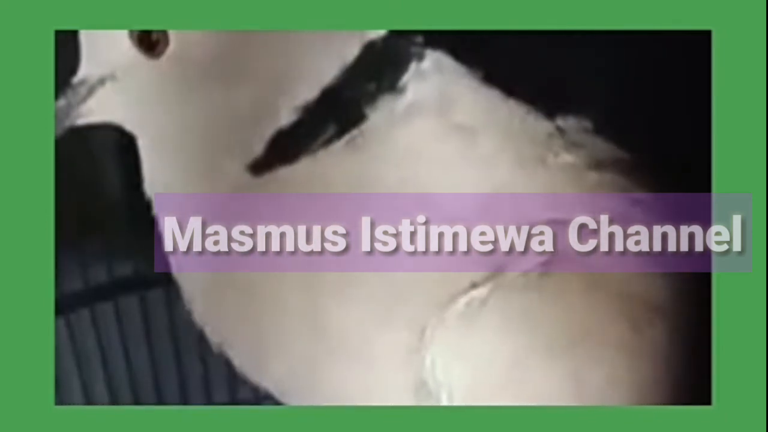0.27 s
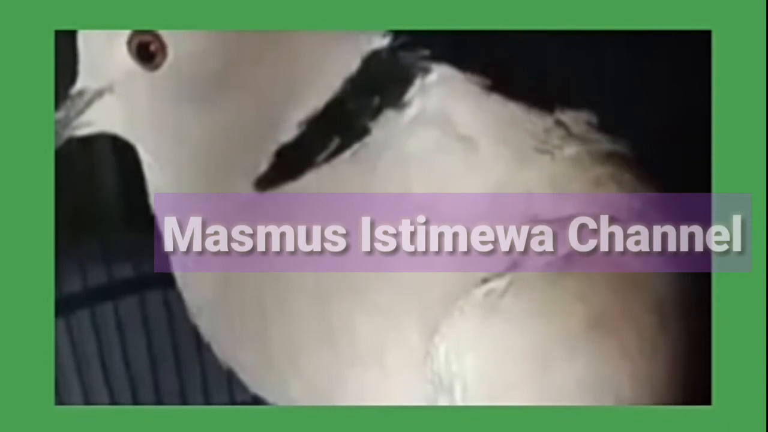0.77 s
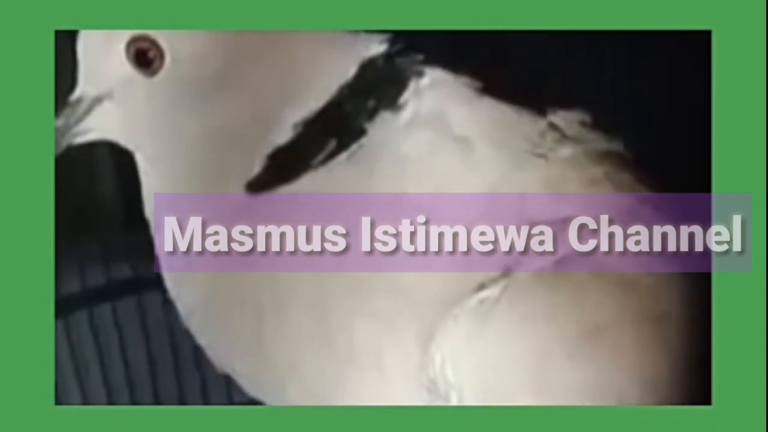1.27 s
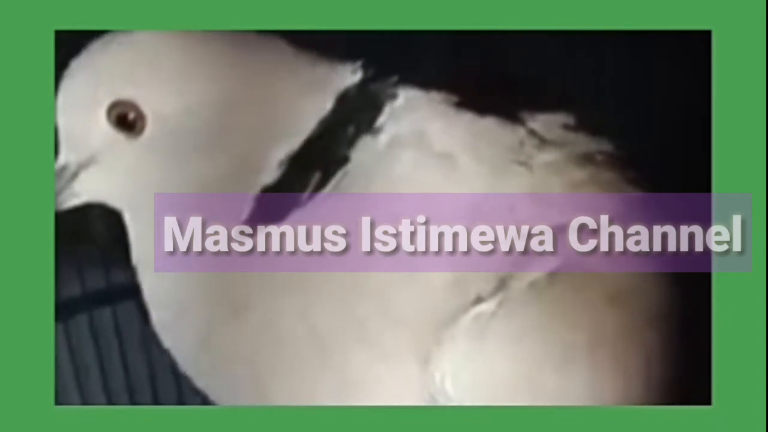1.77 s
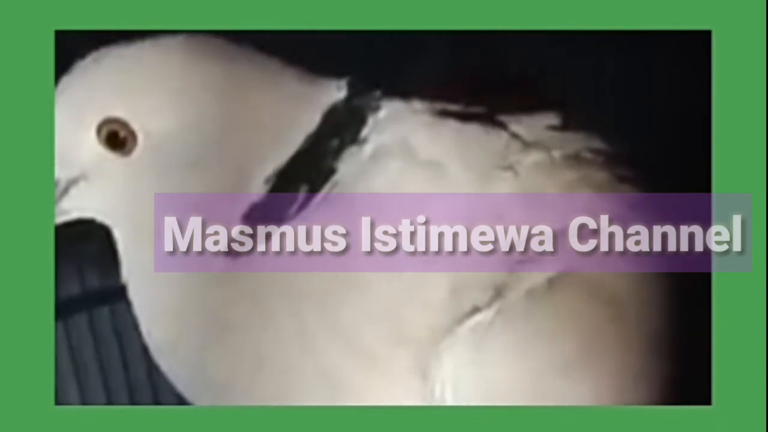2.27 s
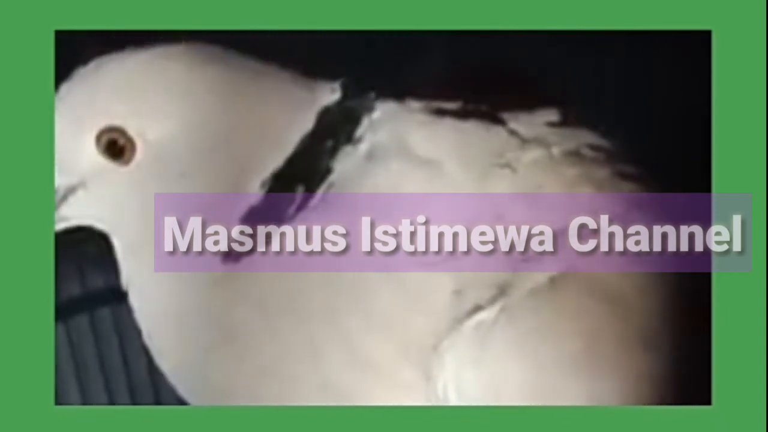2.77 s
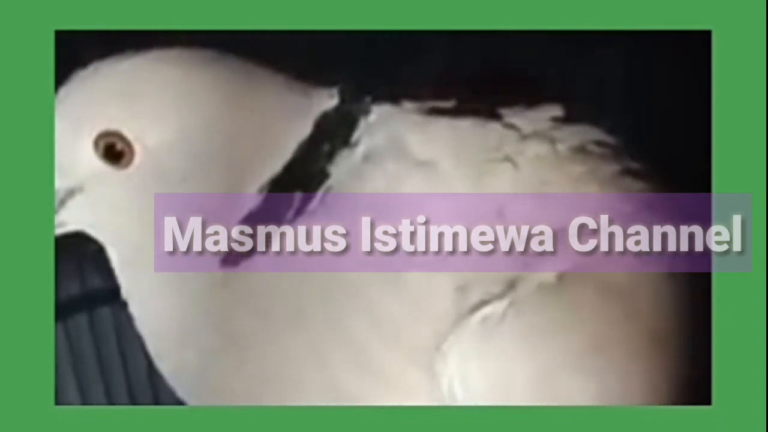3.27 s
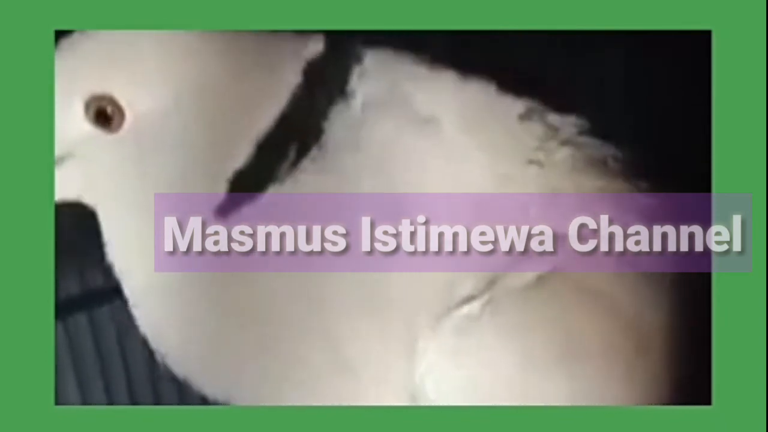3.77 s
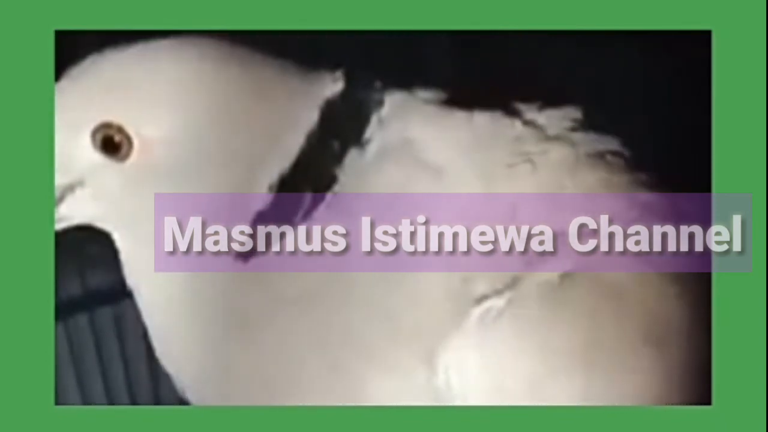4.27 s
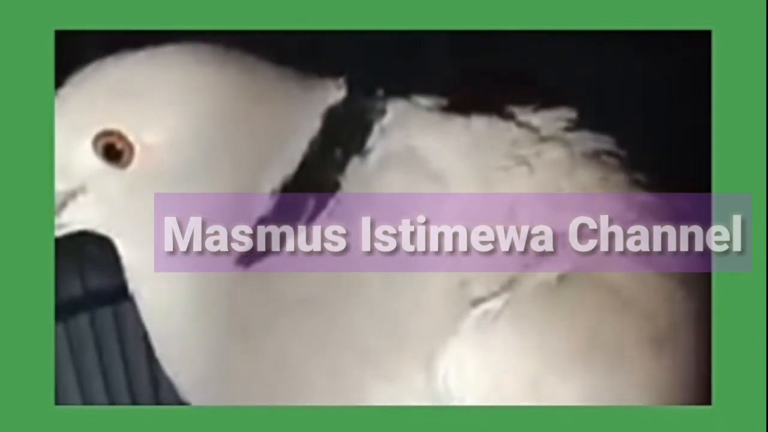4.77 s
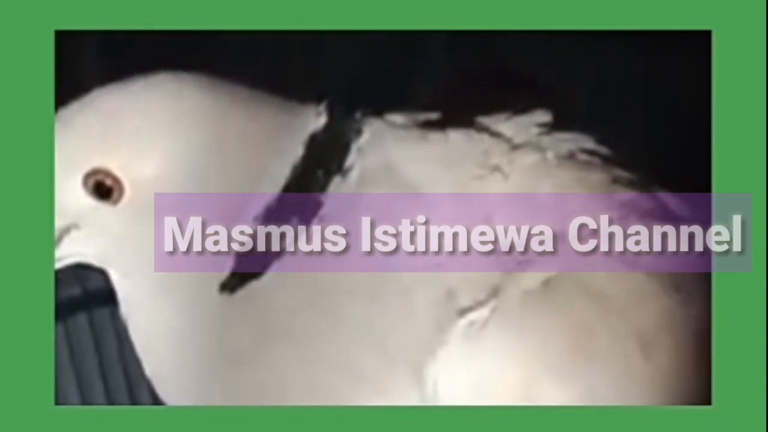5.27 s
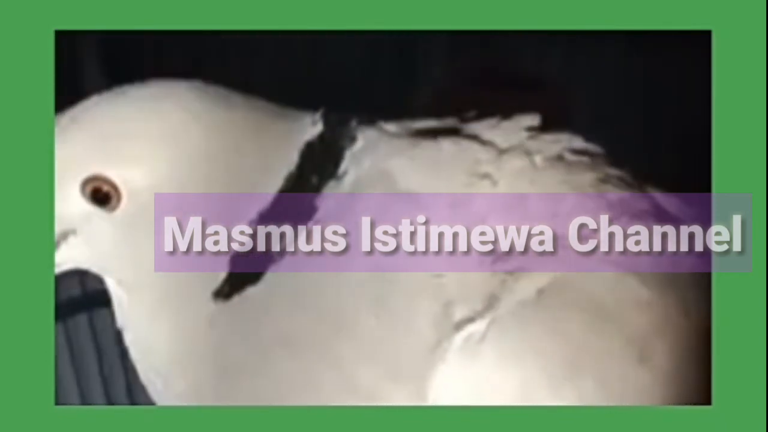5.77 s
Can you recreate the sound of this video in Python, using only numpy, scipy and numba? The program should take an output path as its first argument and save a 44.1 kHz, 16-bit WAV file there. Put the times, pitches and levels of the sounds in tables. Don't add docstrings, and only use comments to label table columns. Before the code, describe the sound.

A caged dove coos twice, close and dry with slight dull room echo. Each coo starts with a brief note, bubbles through quickening throaty pulses, and swells into a smooth hollow tone of about a second that breaks lower. Between them comes a rough, strained croak; a distant dove calls behind it, over faint room noise.

```python
import sys
import numpy as np
from scipy import signal
from scipy.io import wavfile
from scipy.ndimage import uniform_filter1d
from numba import njit

SR = 44100
rng = np.random.default_rng(int(sys.argv[2]) if len(sys.argv) > 2 else 0)


def generate_wav(signal):
    frames = np.transpose(np.atleast_2d(signal))
    scaled = np.clip(frames, -1, 1) * 32767
    pcm = np.round(scaled).astype(np.int16)
    wavfile.write(sys.argv[1], SR, pcm)


def undo_db(level):
    steps = np.asarray(level, float) / 20
    return 10 ** steps


N = 265437
T = np.arange(N) / SR


@njit
def svf(x, hz, width):
    y, b, l = np.empty(len(x)), 0., 0.
    g, k = np.tan(np.pi * hz / SR), width / hz
    for i in range(len(x)):
        v = (b + g * (x[i] - l)) / (1 + g * (g + k))
        b, l, y[i] = 2 * v - b, l + 2 * g * v, k * v
    return y


def unit(x):
    return x / np.sqrt(np.mean(x ** 2))


def smooth_twice(x, size):
    return uniform_filter1d(uniform_filter1d(x, size), size)


def walk(rate):
    hold = int(SR / rate)
    steps = np.repeat(rng.standard_normal(N // hold + 1), hold)
    return unit(smooth_twice(steps, hold)[:N])


def tracks(tables, edge_s):
    s, *columns = np.vstack(tables).T
    gate = sum((T >= t[0][0]) & (T < t[-1][0]) for t in tables) > 0
    soft = smooth_twice(1. * gate, int(edge_s * SR) + 1)
    return soft, [uniform_filter1d(np.interp(T, s, c), size=80) for c in columns]


def by_start(tables):
    return sorted(tables, key=lambda t: t[0][0])


def spans(rows, edge_s):
    total = 0
    for s, length, db in rows:
        to_edge = np.minimum(T - s, s + length - T)
        total = total + undo_db(db) * np.clip(to_edge / edge_s + .5, 0, 1) ** 2
    return total


def bell(hz, centre_hz, width_hz):
    return 1 / (1 + (2 * (hz - centre_hz) / width_hz) ** 2)


def band(hz, width_hz):
    noise = rng.standard_normal(N)
    for _ in range(3):
        noise = svf(noise, 1. * hz, 2. * width_hz)
    return unit(noise)


# [Hz, dB per Hz]
ROOM_TONE = [(30, -11), (120, -5.5), (280, -9), (520, 7.5), (800, -16), (2500, -21.5), (5000, -19.5),
             (10000, -30.5)]


def floor():
    hz, db = np.transpose(ROOM_TONE)
    noise = 0
    for f in 35 * 2 ** (np.arange(23) * 2 / 5):
        level_db = np.interp(np.log(f), np.log(hz), db) + 1.8 * walk(21)
        noise = noise + undo_db(level_db) * svf(svf(rng.standard_normal(N), f, f / 3), f, f / 3)
    return undo_db(-71) * unit(noise)


# [s, Hz, dB]
THIRD_DOVE = [
    [(0, 378, -56.5), (.3, 356, -57.5), (.5, 350, -67), (.72, 351, -59.5)],
    [(4.08, 437.1, -69.5), (4.2, 439.7, -45), (4.45, 430.7, -48), (4.68, 426, -42.5), (4.81, 393, -56.5)],
]
# [s, Hz, dB]
FAR_DOVE = [
    [(2.94, 515.2, -65.5), (2.986, 507.1, -48), (3.278, 505.4, -45), (3.32, 506.2, -38.5),
     (3.6, 497.8, -37.5), (3.8, 503, -36)],
    [(3.8, 499, -44), (3.95, 499, -26), (4.08, 503.7, -39), (4.288, 496, -36.5), (4.406, 489, -46),
     (4.46, 485, -44.5), (4.72, 481, -41)],
]


def far_dove(tables, flutter_db, octave_db, third_db):
    gate, (hz, db) = tracks(by_start(tables), edge_s=.02)
    turn = 2 * np.pi * np.cumsum(hz * (1 + 0.00319 * walk(25))) / SR
    rich_db = np.clip(.7 * (505 - hz), 0, 14)
    tone = np.sin(turn)
    for k, partial_db in ((2, octave_db), (3, third_db)):
        tone = tone + undo_db(partial_db + rich_db + 6 * walk(10) + 4 * walk(50)) * np.sin(k * turn)
    level = undo_db(uniform_filter1d(db, size=900) + flutter_db * walk(24))
    return np.sqrt(2) * gate * level * tone


# [Hz, Hz, dB]
PORT_SIDES = [(2370, 150, -61), (3100, 1200, -71), (5740, 480, -74.5), (6570, 59, -54), (7400, 550, -70.5)]


def port_overtones(hz, turn):
    out = 0
    for k in range(5, 19):
        passed = sum(undo_db(db) * bell(k * hz, f, width) for f, width, db in PORT_SIDES)
        out = out + undo_db(6 * walk(22)) * np.sin(k * turn) * passed
    return out


# [s, s, dB]
PORT_RINGS = [(.07, 0.12, -73.5), (.235, 0.032, -69.5), (.8, 0.1, -73.5), (.9, 0.14, -55),
              (1.325, 0.38, -53), (1.7, 0.13, -68), (2.175, .03, -65), (2.3, 0.087, -63.5),
              (2.5, 0.084, -72.5), (2.66, 0.095, -71.5), (3.45, 0.24, -75.5), (3.6, .15, -50.5),
              (3.93, 0.086, -71.5), (4.025, 0.033, -60), (4.6, 0.021, -60), (4.675, 0.071, -58),
              (4.74, 0.1, -81), (5.72, 0.14, -64), (5.915, .12, -75.5)]


def port_ring(gate, hz, level_db, turn):
    port_hz = 4970
    partials = range(8, 17)
    share = [bell(k * hz, port_hz, 200) ** 2 for k in partials]
    line = sum(g * undo_db(1.4 * walk(40)) * np.sin(k * turn) for k, g in zip(partials, share))
    line = line / np.sqrt(sum(g * g for g in share))
    glide_hz_per_s = uniform_filter1d(np.abs(np.gradient(hz)) * SR, 800)
    held = gate * np.clip(1 - glide_hz_per_s / 500, 0, 1)
    ring = np.sqrt(2) * held * line + (1 - held) * band(port_hz, 110)
    jolts = spans(PORT_RINGS, edge_s=0.021) * undo_db(1.6 * walk(14))
    return (jolts + gate * undo_db(level_db - 71.5)) * ring


# [s, Hz, dB]
SHORT_NOTES = [
    [(.02, 386.4, -54), (.045, 413.7, -32), (.062, 443.3, -22.5), (.087, 468.9, -17.5), (.125, 467.4, -18),
     (.16, 455.2, -19.5), (.205, 476.6, -15.5), (.27, 466.6, -20.5), (.282, 480.7, -46)],
    [(2.79, 328, -63), (2.818, 326.8, -53.5), (2.86, 297.2, -72)],
    [(3.822, 410, -42.5), (3.85, 430.3, -19), (3.868, 545.5, -13), (3.915, 541.3, -20), (3.943, 497.2, -13),
     (3.97, 447.5, -20), (3.986, 428.3, -21), (4.041, 435.8, -22.5), (4.064, 394.5, -54)],
]
# [s, Hz, dB]
ROLL_SWELLS = [
    [(.795, 510, -48), (.802, 489, -21), (.835, 388.1, -40), (.87, 443.4, -23.5), (.892, 479.6, -18),
     (.945, 496.5, -17.5), (.99, 492.5, -17.5), (1.055, 509.4, -12.5), (1.077, 530.7, -18.5)],
    [(4.648, 414, -42.5), (4.661, 423.4, -27), (4.691, 472.7, -15), (4.705, 508.3, -14.5),
     (4.726, 557.4, -20.5), (4.739, 525.3, -17.5)],
]
# [s, Hz, dB]
HELD_NOTES = [
    [(1.16, 545, -15.5), (1.241, 551.4, -12.5), (1.46, 554.2, -13), (1.641, 549.3, -12.5),
     (1.788, 544.5, -13.5), (1.82, 543.8, -15.5), (1.9, 535, -16), (1.96, 532.5, -17), (2.176, 511, -11.5)],
    [(4.76, 528.9, -19), (4.883, 524.7, -17.5), (4.942, 530.7, -19.5), (5.003, 522.7, -17.5),
     (5.044, 528, -18.5), (5.249, 519.6, -16), (5.375, 521.5, -16), (5.586, 514, -13),
     (5.798, 497.5, -11.5)],
]
# [s, Hz, dB]
LOW_BREAKS = [
    [(2.2, 493, -11.5), (2.227, 411.6, -25.5), (2.236, 429, -20.5), (2.333, 413.3, -23),
     (2.4, 400.3, -29.5), (2.47, 385, -38.5), (2.6, 362, -42.5), (2.72, 350.8, -46.5), (2.755, 345.5, -55)],
    [(5.866, 486, -17), (5.89, 471, -14.5), (5.903, 450.4, -15.5), (5.914, 401.7, -27.5),
     (5.932, 415, -22.5), (5.982, 405.6, -27.5), (6.03, 408, -27)],
]
# [Hz, dB]
OCTAVE_TRACT = [(640, -41.5), (720, -37.5), (780, -29.5), (850, -36.5), (950, -42.5), (1010, -50.5),
                (1100, -60.5)]
# [Hz, dB]
UPPER_TRACT = [(1200, -63.5), (1400, -59), (1460, -40.5), (1590, -45.5), (1660, -60), (1750, -73),
               (1930, -61.5), (2080, -85)]
# [s, s, dB, dB]
SETTLED_SPANS = [(.03, 0.36, -2, -6), (1.13, 0.094, -21, -1.5), (1.23, .45, -19.5, -13.5),
                 (1.68, .22, -15.5, -6), (2.02, 0.19, -19, -4.5), (3.86, 0.098, -26.5, -7),
                 (4.68, .43, -25.5, 2.5), (5.111, 0.47, -13.5, -3), (5.56, 0.36, -24, -8.5)]


def coo():
    long_coos = [a + b + c for a, b, c in zip(ROLL_SWELLS, HELD_NOTES, LOW_BREAKS)]
    gate, (hz, level_db) = tracks(by_start([*SHORT_NOTES, *long_coos]), edge_s=.001)
    turn = 2 * np.pi * np.cumsum(hz * (1 + 0.00037 * walk(30))) / SR
    drive = undo_db(.48 * level_db)
    level_db = level_db + 0.2 * walk(35) + 0.48 * walk(90) + 0.22 * walk(220)
    tone = undo_db(level_db) * np.sin(turn)

    settled_db = sum(np.outer(db, spans([(s, length, 0)], 0.065)) for s, length, *db in SETTLED_SPANS)
    for k in range(2, 5):
        passed_db = np.interp(k * hz, *np.transpose(UPPER_TRACT if k > 2 else OCTAVE_TRACT))
        tract = undo_db(passed_db + settled_db[int(k > 2)])
        waver = undo_db((0.46 + 0.47 * k) * walk(70) + 1.5 * walk(12))
        tone = tone + drive * tract * waver * np.sin(k * turn)

    side = undo_db(level_db + 3 * walk(20)) * bell(hz, 553, 16)
    flutter = 2 * np.pi * 100 * T
    tone = tone + side * (undo_db(-38.5) * np.sin(turn + flutter) + undo_db(-50.5) * np.sin(turn - flutter))

    tone = tone + undo_db(level_db - 5.0) * port_overtones(hz, turn)
    return np.sqrt(2) * gate * tone + port_ring(gate, hz, level_db, turn)


# [s, dB, Hz]
AIR_PUFFS = [
    (.262, -55, 60.5),
    (.794, -45.5, 159),
    (4.537, -58, 120),
    (4.605, -54.5, 120),
    (6.005, -46, 60.5),
]


def puffs():
    out = 0
    for s, db, hz in AIR_PUFFS:
        t = T - s - .008
        out = out + undo_db(db) * np.exp(-(t / 0.0045) ** 2) * np.cos(2 * np.pi * hz * t)
    return out


# [s, dB, s, dB, Hz]
ROLL_PULSES = [(0.512, -70, .022, -57, 354), (0.559, -47.5, .024, -52.5, 335),
               (0.606, -40.5, 0.03, -49.5, 363), (0.66, -40.5, .032, -43, 385), (0.715, -38, .03, -39, 394),
               (0.731, -57.5, .052, -38.5, 395), (0.788, -47, 0.012, -57, 280.6),
               (4.313, -33, 0.027, -56, 318), (4.366, -40.5, 0.019, -50, 320),
               (4.415, -29.5, 0.022, -48.5, 334), (4.473, -21, 0.03, -37.5, 381.5),
               (4.535, -16.5, .073, -44, 374), (4.604, -15.5, .04, -37.5, 366.4)]


def roll():
    out, t = np.zeros(N), T[:int(.08 * SR)]
    for s, pop_db, length, hum_db, hum_hz in ROLL_PULSES:
        weak = np.clip((-41.5 - pop_db) / 10, 0, 1)
        pop_hz = 475 + (566 - 475) * weak
        swell = np.sin(np.pi * np.clip(t / 0.015, 0, 1) ** 0.75) ** 2
        click = 0.02 * np.sin(2 * np.pi * 1500 * t) * rng.uniform()
        pop = swell * (np.sin(2 * np.pi * pop_hz * t) + click + 0.0058)
        u = np.clip(t / length, 0, 1)
        steady = 2 * np.pi * hum_hz * t
        sagging = 2 * np.pi * np.cumsum(hum_hz * (1 + 0.42 * (2 * u - 1) ** 4)) / SR
        voice = np.sin(sagging) + 0.32 * np.sin(3 / 2 * steady) + .3 * np.sin(2 * steady)
        hum = np.sin(np.pi * u) ** 0.63 * voice
        out[int(s * SR):][:len(t)] += undo_db(pop_db) * pop + undo_db(hum_db) * hum
    return out


# [s, s, Hz, dB]
MURMURS = [(.86, .18, 339, -61.5), (1.78, .16, 385, -51.5), (1.88, 0.56, 490, -42),
           (2.6, 0.23, 464, -52.5), (2.87, 0.59, 428, -59.5), (4.68, 0.38, 370.3, -52.5),
           (4.88, 0.19, 445, -36), (5.08, 0.47, 362, -53), (5.65, 0.29, 373, -59), (5.88, .25, 450, -45),
           (2.47, 0.15, 155, -72), (1.9, 0.25, 260, -68), (3.29, 0.2, 105, -66.5), (4.7, .1, 215, -62),
           (5.5, 0.77, 330, -65), (0.904, 0.075, 630, -48.5)]


def murmur():
    lumpy, a, b = undo_db(3 * walk(14)), walk(70), walk(70)
    out = 0
    for s, length, hz, db in MURMURS:
        turn = 2 * np.pi * hz * T
        out = out + spans([(s, length, db)], 0.15) * (a * np.sin(turn) + b * np.cos(turn))
    return lumpy * out


# [s, Hz, dB, 0-1, Hz]
CROAK_BREATH = [
    [(3.27, 172, -55.5, .05, 806), (3.32, 168.4, -32.5, 0.3, 766), (3.4, 157, -30.5, 0.3, 719),
     (3.43, 180.2, -33.5, 0.3, 715), (3.55, 197, -35, .35, 760), (3.65, 207, -32, .95, 721),
     (3.7, 205, -36, .95, 760), (3.75, 197.8, -31.5, .9, 794), (3.81, 158.9, -43.5, 0.6, 774.5)],
]
# [Hz, Hz, dB]
HISS_BANDS = [(7800, 490, -10), (4400, 300, -21), (3500, 300, -19.5), (6100, 250, -26), (11200, 400, -27),
              (12600, 600, -25), (15200, 400, -13.5), (1450, 350, -11), (900, 150, -6.5), (110, 66, -10.5)]


def croak():
    gate, (hz, throat_db, strain, beak_hz) = tracks(CROAK_BREATH, edge_s=.012)
    low_db = throat_db - 7.5 + 0.42 * (np.minimum(hz, 195) - 195) + 2 * walk(30)
    beak_db = throat_db - 30 + 38.5 * strain + 1.6 * walk(30)
    hiss_db = throat_db - 61 + 42.5 * strain
    throat_hz = 3.17 * hz * (1 - 0.2 * strain)
    half = np.clip(strain + 0.29 * walk(30), 0, 1)
    throat_db = throat_db + 1.6 * walk(32)
    turn = np.pi * np.cumsum(hz * (1 + 0.008 * walk(70) * (0.29 + half))) / SR

    voice = 0
    for k in range(2, 21):
        f = k * hz / 2
        body = undo_db(low_db) * bell(f, 87, 260)
        body = body + undo_db(throat_db) * bell(f, throat_hz, 140) ** 2
        body = body + undo_db(beak_db) * bell(f, beak_hz, 190) ** 2
        body = body + undo_db(beak_db - 16.0) * bell(f, 860, 110) ** 2
        rough = undo_db(4.66 * np.tanh(walk(75)) * (k > 2))
        phase = rng.uniform(0, 2 * np.pi) + .5 * (k > 2) * walk(45)
        voice = voice + (half if k % 2 else 1) * rough * body * np.sin(k * turn + phase)

    hiss = sum(undo_db(db) * band(f, width) for f, width, db in HISS_BANDS)
    puffing = (1 + 0.5 * np.cos(turn)) * undo_db(2.5 * np.tanh(walk(120)))
    return gate * (np.sqrt(2) * voice + undo_db(hiss_db) * puffing * hiss)


def room(x, t60, damp_hz):
    t = T[:int(.6 * SR)]
    fade = undo_db(-60 * t / t60) * (t > .008)
    dull = svf(rng.standard_normal(len(t)), damp_hz, damp_hz / 2)
    return signal.fftconvolve(x, dull * fade / np.sqrt(np.sum(fade ** 2)))[:N]


def scene():
    near = coo() + roll() + croak() + puffs()
    far = far_dove(FAR_DOVE, flutter_db=1., octave_db=-45, third_db=-43)
    far = far + far_dove(THIRD_DOVE, flutter_db=2., octave_db=-40, third_db=-62) + murmur()
    echoes = undo_db(-24) * room(near + far, t60=.26, damp_hz=500.)
    return (near + far + echoes + floor())[None]


# [s, dB, s]
LEVEL_DIPS = [
    (.2704, -5, .001),
    (2.111, -1.5, .0015),
    (5.766, -1.5, .005),
]


def dip_level(x):
    cut_db = 0
    for s, db, attack in LEVEL_DIPS:
        cut_db = cut_db + db * np.clip((T - s) / attack, 0, 1) * np.exp(-np.abs(T - s) / .014)
    return x * undo_db(cut_db)


def low_pass(x):
    return signal.sosfilt(signal.butter(12, 15480, fs=SR, output="sos"), x)


def record(dry):
    bass_cut = signal.butter(1, 40, "high", fs=SR, output="sos")
    mix = signal.sosfilt(bass_cut, dip_level(dry))
    return low_pass(mix)


dry = scene()
out = record(dry)
generate_wav(out)
```